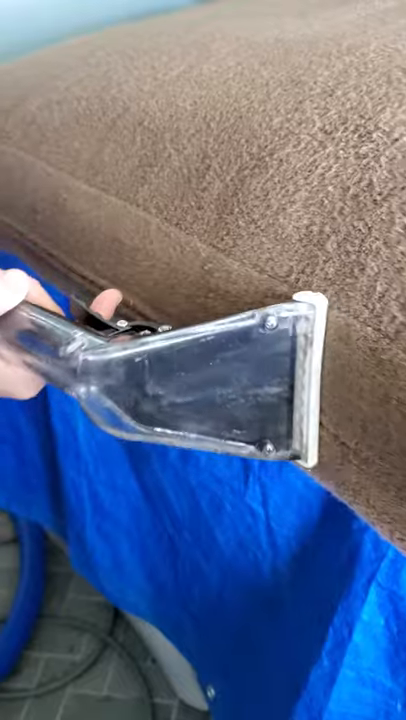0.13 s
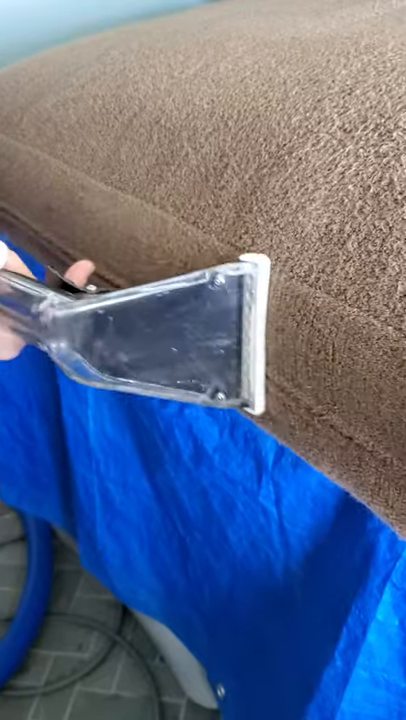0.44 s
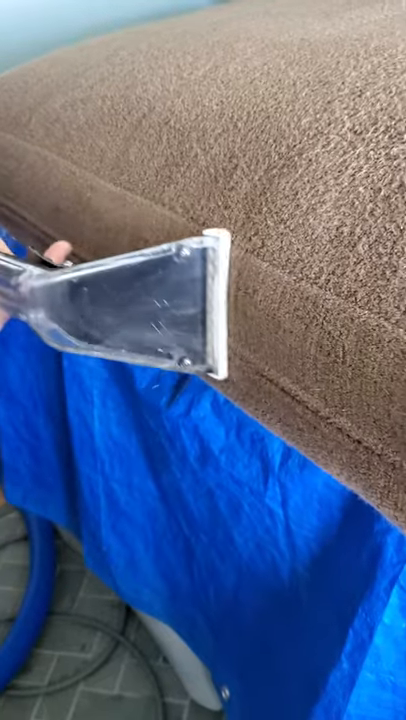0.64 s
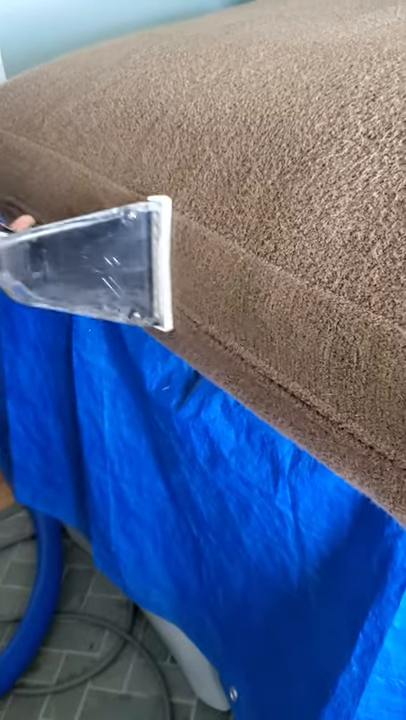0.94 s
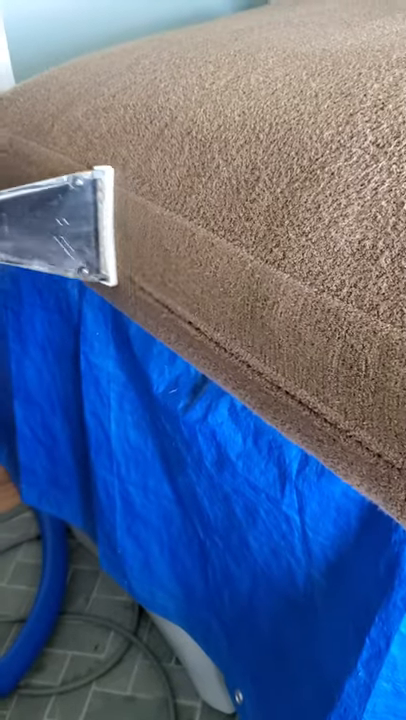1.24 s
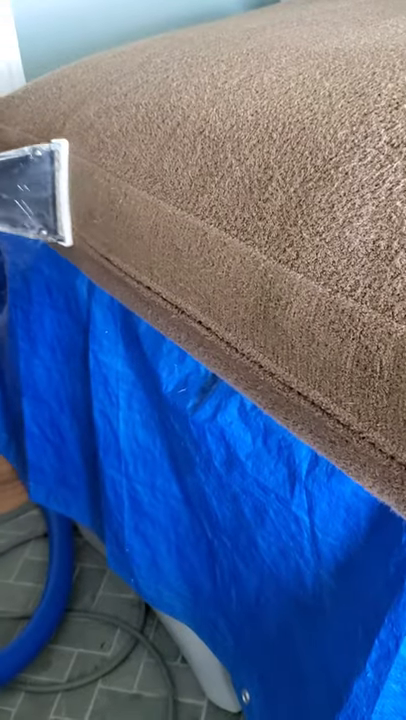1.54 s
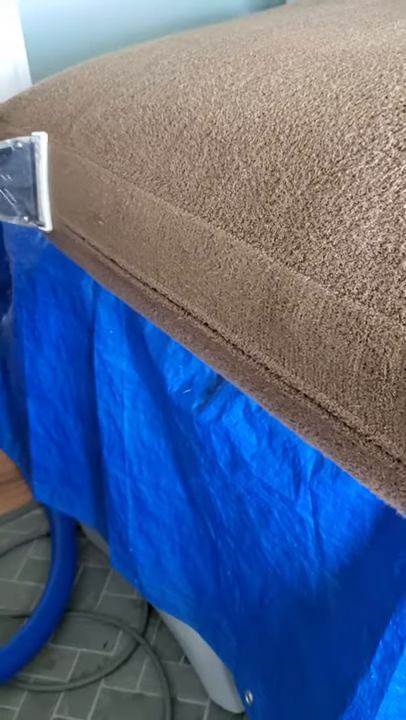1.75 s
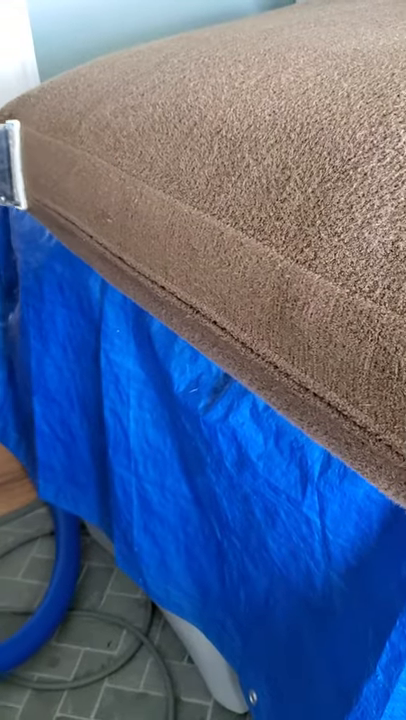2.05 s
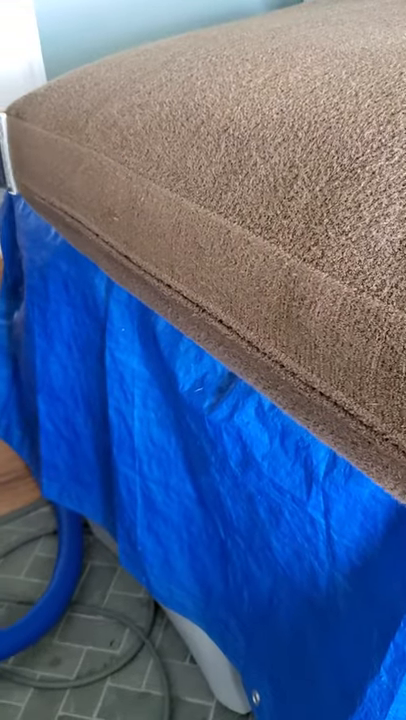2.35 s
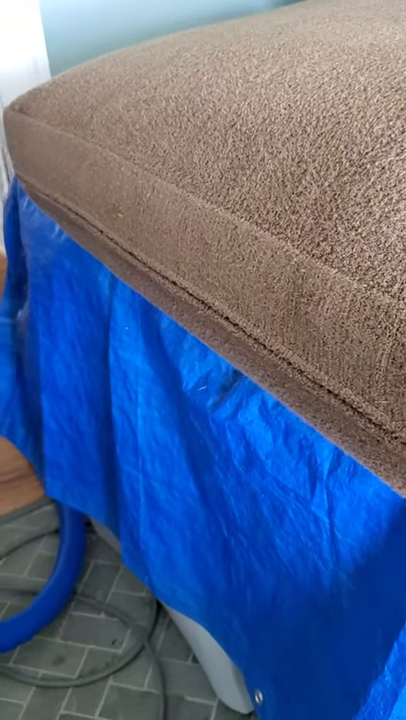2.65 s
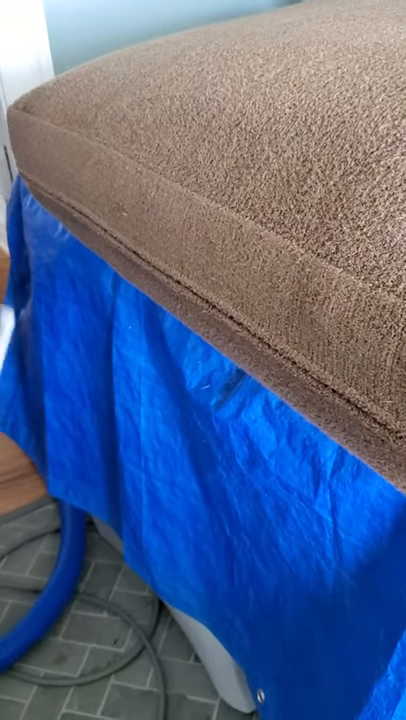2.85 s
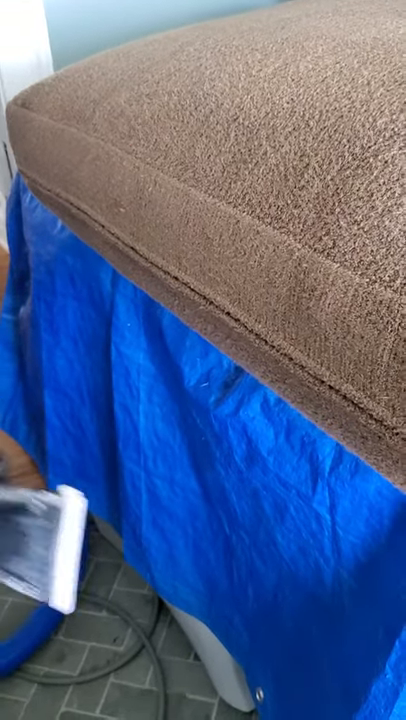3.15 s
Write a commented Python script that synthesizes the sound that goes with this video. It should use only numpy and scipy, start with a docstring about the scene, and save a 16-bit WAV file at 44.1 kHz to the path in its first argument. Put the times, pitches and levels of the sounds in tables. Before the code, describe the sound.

Close stereo pickup indoors of a wet vacuum motor humming over steady roar, with faint fabric fizz; near the end the suction seal breaks with a gulp and squeal, and harsh hissing air dominates the lowered motor.

```python
"""Small room: an upholstery extractor runs while its nozzle is drawn along a cushion.
Motor hum and two fan whines climb on one shaft speed as fabric chokes the intake, over a
pump throb, a drone and noise roar coloured by hose, tank and room. At the edge a wavering
tone whistles, noise gulps and slurps and the nozzle comes free: the motor slows, and the
bright hiss of the open slot makes a gain control push everything else down."""
import sys
import numpy as np
from scipy import signal
from scipy.fft import rfft, irfft, next_fast_len
from scipy.io import wavfile
from scipy.ndimage import map_coordinates

SR = 44100
rng = np.random.default_rng(int(sys.argv[2]) if len(sys.argv) > 2 else 0)


def put_to_file(sound):
    """Save the sound as 16-bit audio at rate SR, in the file named by the first command-line argument."""
    columns = np.atleast_2d(sound).T  # one column per channel
    safe = np.clip(columns, -1, 1)
    whole_steps = np.round(safe * 32767)
    wavfile.write(sys.argv[1], SR, whole_steps.astype(np.int16))


N = 145971
TIME_S = np.arange(N) / SR


def amp(db):
    """Decibels to gain."""
    return 10 ** (np.asarray(db) / 20)


def along(points, hz):
    """Each column after the frequency in Hz, interpolated on a log-frequency axis."""
    point_hz, *columns = np.transpose(points)
    return np.array([np.interp(np.log(hz + 1), np.log(point_hz + 1), c) for c in columns])


def curves(rows):
    """Each column after the time in seconds, interpolated to one value per sample."""
    row_s, *columns = np.transpose(rows)
    return np.array([np.interp(TIME_S, row_s, c) for c in columns])


def wobble(knots_per_s):
    """Smooth random curve: a cubic spline through normal random knots."""
    knots = rng.standard_normal(N // 8)
    return map_coordinates(knots, [TIME_S * knots_per_s], order=3, mode="wrap")


def rush(spectrum, resonances=()):
    """Stereo air noise: a spectrum per side, resonant lifts, partly shared, left side leading."""
    # Each row: frequency in Hz, left-right correlation.
    alike = [(30, 0.94), (125, 1), (260, 1), (500, 0.49), (1000, 0.31), (2000, 0.14), (4000, 0)]
    lead_s = 0.000241  # the machine is nearer the left
    size = next_fast_len(N + 8192)
    hz = np.fft.rfftfreq(size, 1 / SR)

    # mid and side weights that give the wanted correlation
    turn = np.arccos(np.clip(along(alike, hz)[0], -1, 1)) / 2
    mid, side = rfft(rng.standard_normal((2, size))) * [np.cos(turn), np.sin(turn)]

    db = along(spectrum, hz)
    for centre_hz, width_hz, left_db, right_db in resonances:
        bump = 2 ** -((2 * (hz - centre_hz) / width_hz) ** 2)
        db = db + np.outer([left_db, right_db], bump)
    lead = np.exp(1j * np.pi * lead_s * np.outer([1, -1], hz))
    sides = np.array([mid + side, mid - side]) * lead * amp(db)
    return irfft(sides, size)[:, :N] * np.sqrt(SR / 2)


def tone(hz, rough, flutter_per_s, pan_db, drift_rad):
    """Stereo sine, rms about 1 before panning; each side flutters and drifts on its own."""
    carrier = np.exp(2j * np.pi * np.cumsum(hz) / SR)
    sides = []
    for _ in range(2):
        flutter = 1 + rough * (wobble(flutter_per_s) + 1j * wobble(flutter_per_s))
        sides.append(carrier * flutter * np.exp(1j * drift_rad * wobble(2.01)))
    pan = amp([[pan_db / 2], [-pan_db / 2]])
    return np.real(sides) / np.sqrt(.5 + rough ** 2) * pan


def shaft_hum(shaft_hz):
    """Motor hum at the 2nd and 4th orders of shaft speed."""
    # Each row: time in seconds, level in dB.
    order_2 = [(.11, -31.5), (.23, -35), (.32, -32.5), (.58, -32.5), (.66, -39.5), (.88, -41), (.98, -32),
               (1.42, -36.5), (1.58, -42.5), (2.6, -50), (2.84, -40), (2.92, -32), (3.1, -34.5),
               (3.3, -27.5)]
    order_4 = [(.11, -46), (.2, -39), (.32, -53), (.85, -45), (1.1, -40), (1.6, -46.5), (2.1, -39),
               (2.45, -37.5), (3.3, -41)]
    low = tone(2 * shaft_hz, rough=0.39, flutter_per_s=25, pan_db=-2.5, drift_rad=0.18)
    high = tone(4 * shaft_hz, rough=0.82, flutter_per_s=20, pan_db=-11.5, drift_rad=0.42)
    return amp(curves(order_2)) * low + amp(curves(order_4)) * high


def fan_whine(shaft_hz):
    """Each fan whines at its blade-passing frequency and the octave above."""
    # Each row: blade count, octave level in dB re whine, octave left-right balance in dB.
    fans = [(9, -14, 8), (11, -8, 1)]
    # Whine of the 9-blade, then the 11-blade fan. Each row: time in seconds, level in dB.
    level_9 = [(.11, -56), (.54, -44), (.66, -34.5), (.79, -40.5), (.92, -33.5), (1.06, -44), (1.3, -31),
               (1.43, -39.5), (1.75, -31.5), (1.87, -37), (2.13, -29.5), (2.3, -38.5), (2.6, -50),
               (3.3, -48)]
    level_11 = [(.11, -41), (.26, -38), (.45, -47), (.6, -40.5), (.9, -42), (1.05, -37), (1.35, -39),
                (1.68, -40.5), (1.95, -44), (2.35, -40), (3.3, -48)]
    out = np.zeros((2, N))
    for (blades, octave_db, octave_pan_db), level in zip(fans, (level_9, level_11)):
        blade_hz = blades * shaft_hz
        whine = tone(blade_hz, rough=0.45, flutter_per_s=45, pan_db=2.0, drift_rad=.3)
        octave = tone(2 * blade_hz, rough=2.1, flutter_per_s=50, pan_db=octave_pan_db, drift_rad=.6)
        out += amp(curves(level)) * (whine + amp(octave_db) * octave)
    return out


def roar():
    """Near-steady motor noise, coloured by resonances of hose, tank and room."""
    # Each row: frequency in Hz, left and right density in dB per Hz.
    motor_roar = [(20, -78, -69), (75, -69, -72), (96, -67, -68.5), (207, -66.5, -65), (291, -63.5, -62),
                  (970, -62, -61), (1134, -67.5, -65.5), (1360, -61, -59.5), (2440, -62, -60),
                  (3500, -68, -64), (4840, -63, -63), (5420, -68, -62.5), (6120, -69.5, -71),
                  (9100, -84, -77), (16000, -97, -95)]
    # Each row: centre in Hz, width at half the dB lift in Hz, left and right lift in dB.
    resonances = [(183.2, 28, 12, 12), (244.7, 16, 10, 11), (299.5, 31, 8.5, 10.5), (319.6, 17, 5.5, 9),
                  (368.8, 33, 6.5, 10.5), (452, 31, 2.5, 5.5), (509, 24.6, 7.5, 8.5), (645, 26, 9, 7.5),
                  (707.5, 25, 11.5, 2), (763.4, 39, 9.5, 7), (864, 28, 7.5, 6), (1013, 33, -6, 7),
                  (1260, 48, 5, 7.5), (1562, 184, 3.5, 5.5), (2026, 194, 0.5, 5.5), (3920, 160, 3.5, 4)]
    return amp(0.34 * wobble(9.2)) * rush(motor_roar, resonances)


def drone():
    """Low machine tone at a fixed frequency."""
    # Each row: time in seconds, level in dB.
    drone_level = [(.11, -39), (1.2, -36.5), (2.2, -38), (2.6, -38.5), (2.82, -22.5), (2.9, -32),
                   (3.3, -37)]
    line = tone(np.full(N, 293.2), rough=0.19, flutter_per_s=16, pan_db=-2, drift_rad=0.14)
    return amp(curves(drone_level)) * line


def motor():
    """Hum and fan whines follow one shaft speed, over roar and drone."""
    # Each row: time in seconds, shaft speed in Hz.
    speed = [(.11, 482), (.21, 484), (.58, 498), (.95, 506.5), (1.35, 511), (2.05, 511.5), (2.52, 513),
             (2.92, 494), (3.08, 491), (3.17, 483), (3.3, 477)]
    shaft_hz = curves(speed)[0] * (1 + 0.00034 * wobble(14))
    return shaft_hum(shaft_hz) + fan_whine(shaft_hz) + drone() + roar()


def open_jet():
    """Noise hiss of the slot as it is uncovered, with air ringing in the nozzle's funnel."""
    # Each row: frequency in Hz, left and right density in dB per Hz, before the gains below.
    hiss = [(1500, -81, -85), (4000, -56.5, -56), (6000, -55, -54.5), (7900, -51.5, -50),
            (9000, -47, -55.5), (10900, -49.5, -49.5), (12100, -44, -45), (15400, -40, -41),
            (21000, -39.5, -42.5)]
    funnel = [(500, -87, -81), (1200, -69, -64), (1630, -70, -61), (2480, -61, -56), (3500, -55, -50.5),
              (3850, -58, -50), (4220, -48, -46), (4560, -57, -54), (5100, -50, -46.5), (5600, -55, -52),
              (7150, -54, -52), (10100, -64, -56)]
    # Jet strength, then funnel level as the nozzle turns to face us.
    # Each row: time in seconds, gain in dB.
    opening = [(2.1, -44), (2.33, -29), (2.44, -22), (2.465, -13.5), (2.5, -14), (2.535, -3), (2.6, -0.5),
               (2.8, 0.5), (3.05, 1.5), (3.3, 2.5)]
    facing = [(2.58, -5), (2.68, -4), (2.76, -3), (2.88, -0.5), (3.15, 0.5), (3.3, 1)]
    ringing = amp(curves(facing) + wobble(20)) * rush(funnel)
    return amp(curves(opening) + 0.43 * wobble(18)) * (rush(hiss) + ringing)


def fabric_fizz():
    """Treble noise of air drawn through the fabric, flickering slowly and quickly."""
    # Each row: frequency in Hz, left and right density in dB per Hz, before the gain below.
    fizz = [(1000, -90, -88), (4900, -75.5, -85.5), (7700, -72.5, -70.5), (8400, -68.5, -80),
            (10300, -71, -74.5), (12500, -68, -71), (15700, -66.5, -70.5), (20000, -73, -78)]
    # Each row: time in seconds, gain in dB.
    fizz_level = [(.11, 2), (.38, 2), (.55, 0), (1.1, 0.5), (1.6, 2), (1.68, 3), (1.85, -0.5), (2.2, 0),
                  (2.4, 2), (2.6, -18)]
    flicker_db = 1.2 * wobble(30.26) + 0.46 * wobble(400)
    return amp(curves(fizz_level) + flicker_db) * rush(fizz)


def hose_gulp():
    """Low noise swell in the hose as air starts to leak in."""
    # Each row: frequency in Hz, left and right density at the peak in dB per Hz.
    gulp = [(40, -80, -85), (75, -65, -60), (107, -56, -54), (160, -64, -62), (400, -62, -72),
            (2000, -110, -110)]
    peak_s, length_s = 2.33, .1
    return np.exp(-((TIME_S - peak_s) / length_s) ** 2) * rush(gulp)


def wet_slurp():
    """Noise burst as the seal breaks, rising and falling at constant dB rates."""
    # Each row: frequency in Hz, left and right density at the peak in dB per Hz.
    slurp = [(100, -80, -80), (250, -76, -66), (699, -60, -57), (2000, -62, -54.5), (5000, -58, -58.5),
             (8900, -61, -63), (15000, -60, -62)]
    peak_s, rise_db_per_s, fall_db_per_s, flutter_db = 2.5, 80, 130, 1.5
    late_s = TIME_S - peak_s
    level_db = np.minimum(rise_db_per_s * late_s, -fall_db_per_s * late_s)
    return amp(level_db + flutter_db * wobble(250)) * rush(slurp)


def edge_whistle():
    """Rough tone that mostly falls in pitch as the edge gap widens."""
    # Each row: time in seconds, mean pitch in Hz, level in dB.
    whistle = [(2.2, 9860, -70), (2.25, 9920, -41), (2.29, 9650, -37), (2.32, 9300, -33), (2.36, 8950, -33),
               (2.41, 8730, -33), (2.46, 8630, -35), (2.5, 8660, -28), (2.53, 8730, -65)]
    hz, db = curves(whistle)
    sounding = db > max(db[0], db[-1])  # silent outside the table's span
    jittered_hz = hz * (1 + 0.008 * wobble(300))
    line = tone(jittered_hz, rough=0.67, flutter_per_s=220, pan_db=9, drift_rad=.4)
    return sounding * amp(db) * line


def slot_pipe():
    """Brief rough pipe tone of the slot as it comes free."""
    peak_s, length_s, level_db = 2.505, 0.033, -26
    swell = np.exp(-((TIME_S - peak_s) / length_s) ** 2)
    line = tone(np.full(N, 5000), rough=1.3, flutter_per_s=380, pan_db=-6, drift_rad=.4)
    return amp(level_db) * swell * line


def pump():
    """Low throb and overtones as sines of wavering level, the same on both sides."""
    # Each row: frequency in Hz, mean rms level in dB.
    throb = [(29.7, -44.5), (59.5, -64.5), (119.5, -49.5)]
    out = np.zeros(N)
    for hz, db in throb:
        wave = np.sin(2 * np.pi * (hz * TIME_S + rng.random()))
        out += np.sqrt(2) * amp(db + 0.64 * wobble(6.5)) * wave
    return out


def scene():
    """Sum of the machine and its nozzle."""
    nozzle = open_jet() + fabric_fizz() + hose_gulp() + wet_slurp()
    return motor() + nozzle + edge_whistle() + slot_pipe() + pump()


def record(dry):
    """Gain control limits smoothed power, the sound cuts in, a lowpass limits the band."""
    ceiling_db, detect_s = -15.5, 0.01
    start_s, rise_s = 0.1036, 0.0032
    keep = np.exp(-1 / (detect_s * SR))
    power = signal.lfilter([1 - keep], [1, -keep], np.mean(dry ** 2, axis=0))
    gain = np.minimum(1, amp(ceiling_db) / np.sqrt(power + 1e-12))
    gate = np.clip((TIME_S - start_s) / rise_s, 0, 1)
    lowpass = signal.firwin(401, 15830, fs=SR)  # cutoff in Hz
    return signal.fftconvolve(dry * gain * gate, lowpass[None], mode="same", axes=1)


dry = scene()
out = record(dry)
put_to_file(out)
```